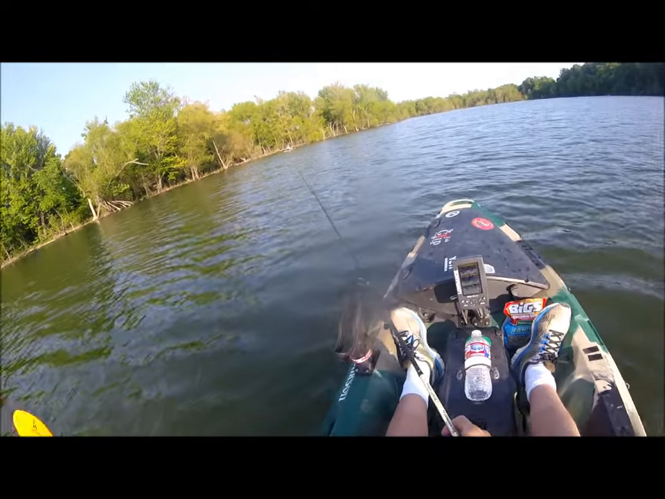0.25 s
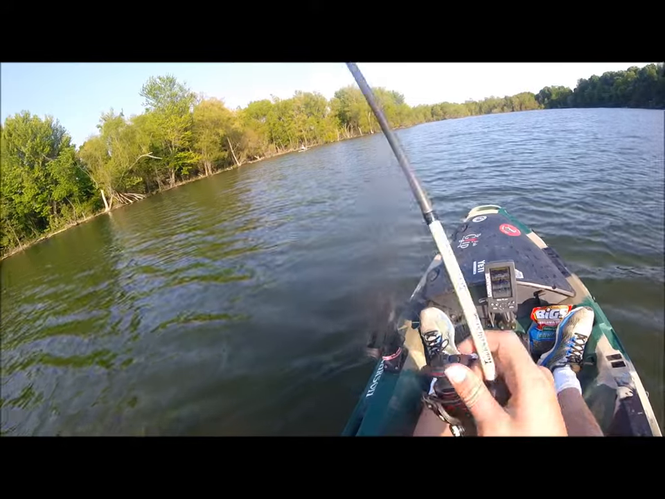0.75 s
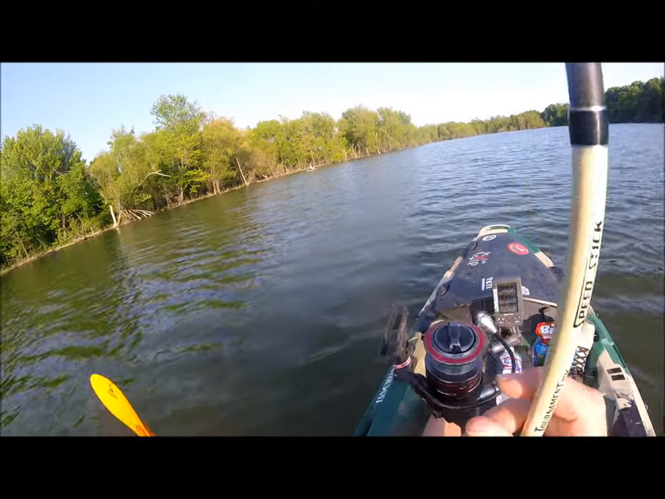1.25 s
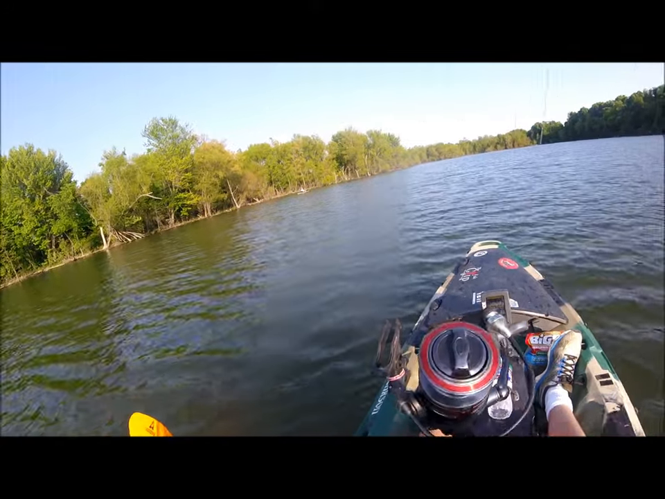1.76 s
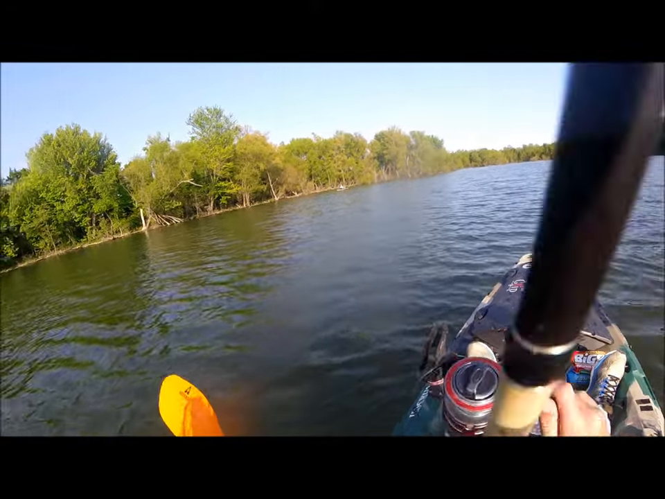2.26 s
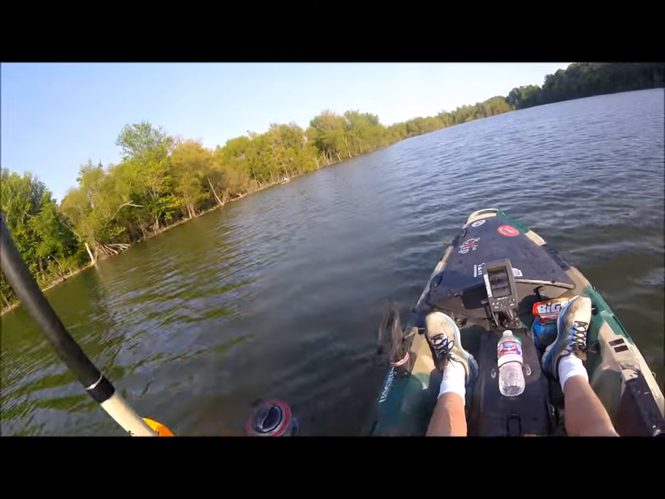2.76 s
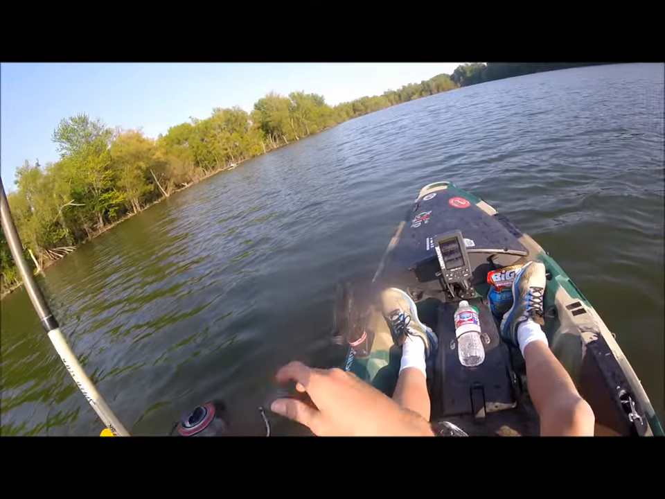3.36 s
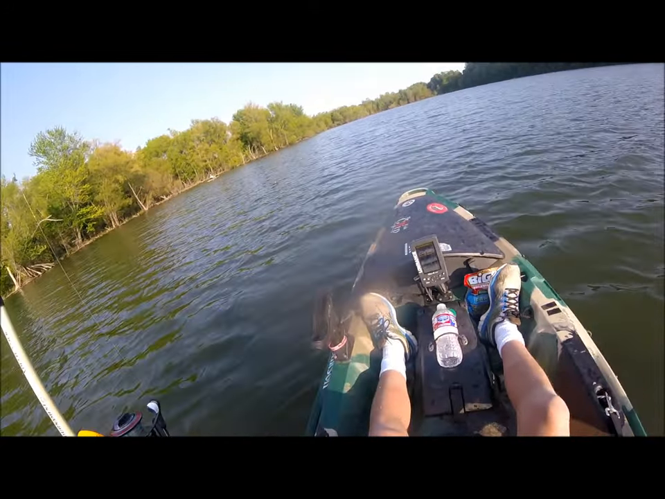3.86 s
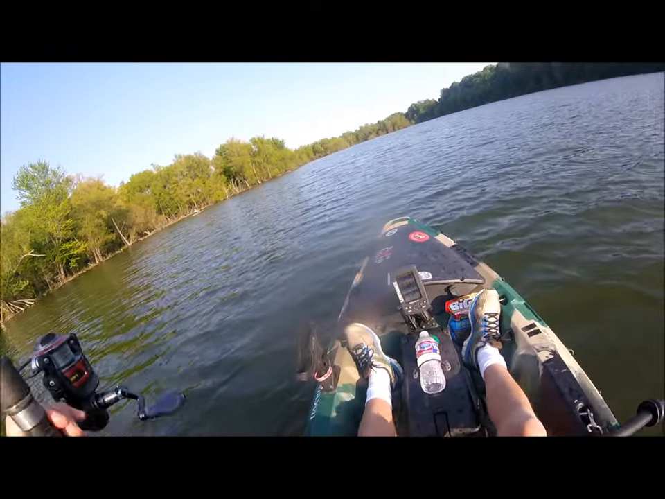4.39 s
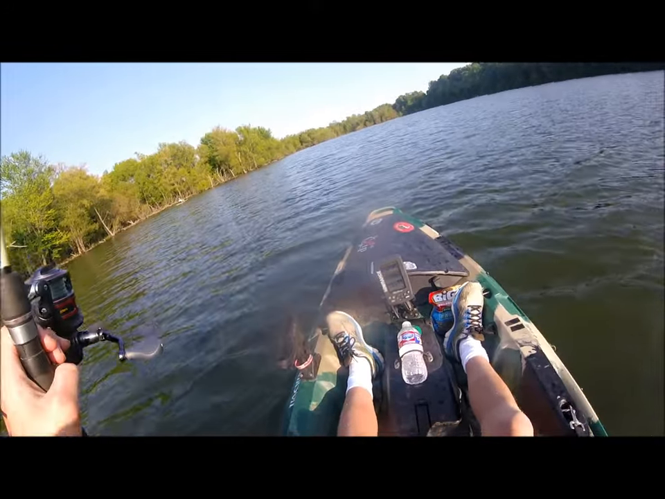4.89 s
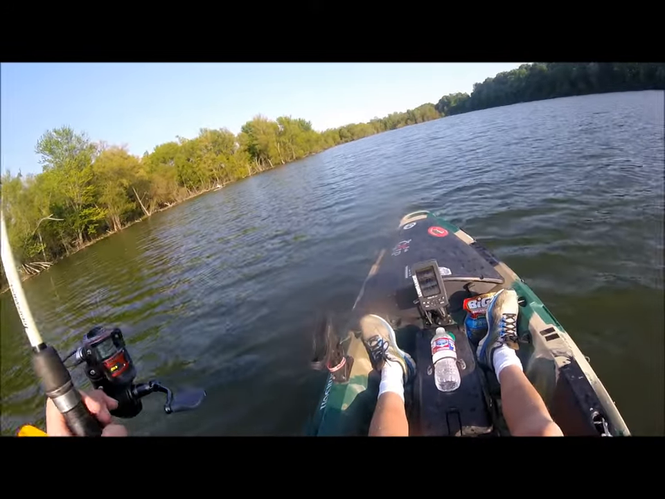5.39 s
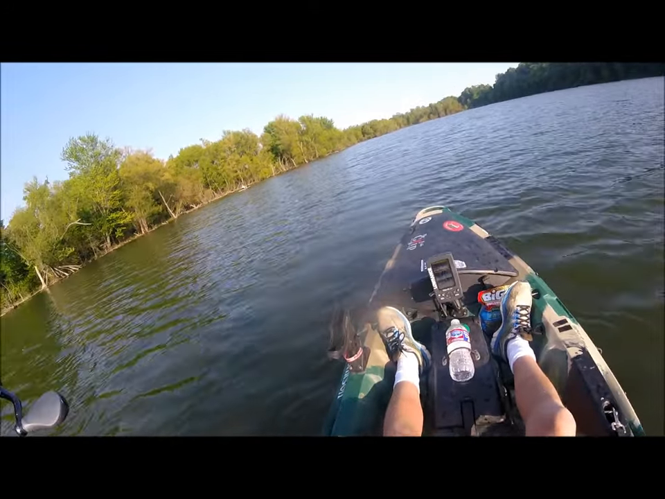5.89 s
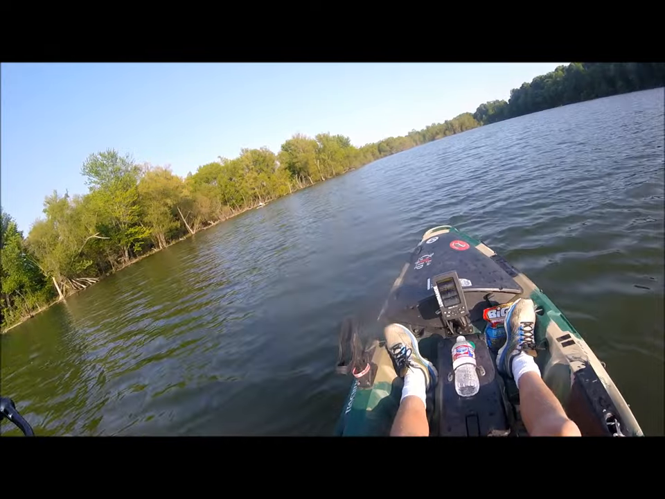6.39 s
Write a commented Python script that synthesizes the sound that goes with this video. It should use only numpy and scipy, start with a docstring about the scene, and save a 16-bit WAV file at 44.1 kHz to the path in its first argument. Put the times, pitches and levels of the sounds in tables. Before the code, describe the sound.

A close, body-worn microphone on a small plastic kayak on open water. From 0 to 0.7 seconds, droplets and light spray fall off a paddle, with bright plips and a few deeper, rounder plops, over lapping and a faint, low, distant motor drone that soon fades. From 0.8 to 2 seconds it is quieter, with sparse drips, tiny rod and reel ticks and a barely audible squeak. At 2.1 a loud, hollow knock hits the hull; at 2.36 a harder one cracks and clatters with a brief scuff. The background drops, then slowly recovers. Faint line scrapes and ticks run from 2.6 to 3.5, with soft wind puffs. Gusts rumble more from 4 onward. Around 4.55 to 4.75, clicks and a small drip meet a heavy, dull floor thump. Another double bump comes at 5.56. Soft rubbing, lapping and wind close the scene until 6.6.

```python
"""Hard knocks of gear on the hollow hull of a plastic kayak: damped modes excited through soft contacts.
Duller floor thuds are modal too; rod, reel and line tick, rub, scrape and squeak by contact and friction.
Drips and spray are ringing bubbles; lapping, fizz, air and wind on the body-worn microphone are filtered
noise; a distant motor is a wavering tone with its octave, beside a faint hum.
The recorder turns its gain down ahead of each overload and recovers slowly."""
import sys
import numpy as np
from scipy import signal
from scipy.io import wavfile
from scipy.ndimage import uniform_filter1d

SR = 44100
rng = np.random.default_rng(int(sys.argv[2]) if len(sys.argv) > 2 else 0)


def store_pcm(level_fs):
    """Save levels as 16-bit WAV."""
    pcm = np.round(np.clip(level_fs, -1, 1) * 32767).astype(np.int16)
    wavfile.write(sys.argv[1], SR, np.atleast_2d(pcm).T)


N = 292824

# distant motor: t/s, mean f/Hz, mean level/dB
MOTOR = [(0, 88.6, -49), (.3, 78.8, -51), (.9, 75.2, -45), (1.3, 76.35, -50.5), (1.75, 75.2, -51.5),
         (2.1, 76.9, -49), (2.6, 78.1, -69), (6.64, 80.3, -80.5)]
HUM_HZ, HUM_DB = 163, -61   # mean values; both waver
# relative noise spectra: f/Hz, spectral level/dB (per Hz)
WIND_COLOUR = [(15, -5.5), (30, 3.5), (55, 0), (100, -9), (160, -21.5), (260, -37), (600, -62), (2000, -93)]
LAP_COLOUR = [(80, 2.5), (180, 3), (450, 2), (900, -3), (1400, -13), (2200, -16.5), (4000, -53)]
FIZZ_COLOUR = [(700, -49), (1500, -2.5), (2200, -3), (3300, -6.5), (4600, -9.5), (5800, 1), (7000, -54.5),
               (10000, -79)]
AIR_COLOUR = [(200, -2.5), (2000, 4), (5000, -6), (7000, 6.5), (8500, -6), (10500, 0.5), (13500, -29),
              (16000, -30)]
AIR_DB, FIZZ_DB = -64, -68.5
# breeze on the microphone, before the wind trim: t/s, level/dB
BREEZE = [(0, -49), (.35, -43.5), (1.2, -49), (1.42, -38.5), (2.25, -45), (2.55, -44.5), (3.3, -41),
          (3.85, -47), (4.25, -39.5), (4.72, -38.5), (5.25, -37.5), (5.47, -45.5), (5.7, -38),
          (6.05, -42.5), (6.45, -39.5), (6.63, -48)]
# gusts, before the wind trim: crest t/s, standard deviation of the bell-shaped envelope/s, level/dB
GUSTS = [(2.672, 0.037, -34), (2.796, 0.03, -38.5), (3.083, 0.025, -34), (3.259, 0.02, -53),
         (3.976, 0.038, -32), (4.085, 0.027, -29), (4.318, 0.02, -31.5), (4.521, 0.038, -28.5),
         (4.794, 0.0053, -35), (4.86, 0.064, -34.5), (5.21, 0.014, -32), (5.301, 0.029, -34),
         (5.809, 0.012, -29.5), (5.908, 0.029, -30.5), (5.986, 0.026, -34.5), (6.194, 0.067, -35.5),
         (6.61, 0.035, -31.5)]
# continuous lapping, about which the level wanders: t/s, level/dB
LAPPING = [(0, -46), (.8, -55.5), (1.3, -52.5), (2, -54), (2.25, -55), (3.3, -60), (4.3, -57.5),
           (4.9, -59.5), (5.5, -51), (5.9, -56.5), (6.3, -58.5), (6.63, -49.5)]
# wavelets slapping the hull: crest t/s, level/dB
WAVELETS = [(.18, -40.5), (2.019, -48.5), (2.899, -52), (3.32, -53.5), (4.58, -48.5), (4.801, -48),
            (5.79, -48.5), (6.1, -54.5), (6.2, -50.5)]
WAVELET_RISE_S, WAVELET_FALL_S = 0.065, 0.087   # time constants
# water thrown up by the paddle and the line, before each layer's trim: t/s, hold/s, level/dB
SPLASHES = [(0.122, 0.2, -51), (0.443, 0.18, -52), (4.538, 0.065, -55.5)]
SPLASH_ATTACK_S, SPLASH_RELEASE_S = 0.038, 0.052   # time constants
# water trickling off the blade and along the hull, before each layer's trim: t/s, level/dB
TRICKLE = [(0, -69), (.8, -66.5), (1.25, -63.5), (2, -78), (2.4, -72), (4.4, -73.5), (4.8, -69),
           (6.63, -74)]
# clearest bubbles under drips: t/s, peak level/dB, starting f/Hz, pitch rise/(octaves per s), life/s
DRIPS = [(0.109, -45, 3150, 10, .005), (0.1318, -28, 2550, 5, 0.0018), (0.152, -46, 3600, 15, 0.0056),
         (.1786, -39, 2770, 15, 0.0053), (0.2074, -25, 3020, 4, 0.0041), (.223, -42, 4500, 10, .006),
         (0.243, -39, 3630, 9, 0.0059), (0.2442, -32, 5060, 8, 0.0036), (.259, -35, 867, 3, 0.044),
         (0.2831, -21, 682, 16, 0.019), (.292, -26.5, 736, 7, 0.024), (0.2858, -32, 1880, -2, 0.017),
         (0.2852, -29, 2600, 10, 0.0033), (0.3303, -34, 1700, 29, 0.008), (0.343, -44, 3260, 15, .005),
         (.3672, -41.5, 5750, 5, .005), (0.4013, -39.5, 4410, 10, .004), (0.4167, -34.5, 3180, 20, 0.0065),
         (0.4463, -36.5, 3800, 14, 0.0065), (0.462, -38, 903, 28, 0.023), (0.464, -35, 3180, 10, .005),
         (0.498, -36, 837, -5, 0.025), (0.4994, -35, 3780, 21, 0.0055), (0.501, -32.5, 1530, 54, 0.013),
         (0.6006, -32, 4930, 8, 0.0031), (0.604, -30, 1710, 4, 0.013), (0.6367, -29, 890, 20, 0.0077),
         (0.8478, -40.5, 2150, -24, 0.0081), (1.224, -36, 1170, 19, 0.0028), (1.456, -38.5, 860, 1, 0.0061),
         (1.818, -36, 682, 34, 0.049), (1.876, -41, 1070, 1, 0.0078), (4.556, -34, 5716, 10, 0.0037),
         (4.602, -24.5, 2680, 55, 0.0049), (4.607, -37, 1790, 40, .007), (4.617, -44, 4450, 5, 0.0071),
         (4.94, -41, 793, 19, 0.018), (5.039, -31.5, 610, 27.5, 0.035), (5.544, -38, 990, 12, 0.0071),
         (6.094, -41, 1010, 15, 0.0087), (6.293, -38, 1556, -15, 0.012), (6.4, -43.5, 765, 23.5, 0.068),
         (6.545, -37, 1100, 6, 0.0055)]
# thin squeaks: t/s, length/s, mean starting f/Hz, mean ending f/Hz, level/dB, octave level/dB re the tone
SQUEAKS = [(1.3, .11, 1005, 975, -67.5, 6), (1.53, .26, 1000, 988, -60, -2.5),
           (4.05, .06, 3850, 3800, -68, -20), (4.13, .14, 2700, 2570, -67, -20),
           (4.318, .05, 3420, 3330, -66, -20)]
# line scraping off the reel in strokes: t/s, length/s, centre f/Hz, level/dB
SCRAPES = [(2.581, 0.016, 5070, -63), (2.641, 0.028, 4900, -65), (2.705, 0.025, 5410, -63),
           (2.756, 0.025, 5300, -63), (3.142, 0.019, 5280, -58), (3.193, 0.021, 5400, -64),
           (3.213, 0.015, 5500, -56), (3.266, 0.035, 5460, -63), (3.318, 0.023, 5750, -61),
           (3.424, 0.011, 5340, -62), (3.453, 0.018, 5150, -60), (3.473, 0.041, 4950, -53)]
# rubs of line, rod and grip, and gear skidding on the hull: t/s, length/s, centre f/Hz, width/Hz, level/dB
RUBS = [(2.002, 0.097, 4810, 2420, -56.5), (2.37, 0.014, 5260, 1400, -34), (2.403, 0.012, 4450, 910, -25),
        (2.66, 1.25, 2370, 554, -66.5), (2.81, 0.23, 4500, 1300, -67), (5.321, 0.58, 4750, 1870, -63.5),
        (6.071, 0.15, 3550, 3300, -62.5), (6.188, 0.82, 4460, 2400, -64.5)]
# clearest ticks of rod and reel: t/s, peak level/dB, centre f/Hz
TICKS = [(1.158, -40.5, 4980), (1.257, -38, 2600), (1.408, -38.5, 2440), (1.697, -40.5, 3146),
         (1.954, -45, 2950), (2.715, -44, 6430), (2.815, -33.5, 4700), (3.133, -41.5, 3760),
         (3.162, -48, 3950), (3.292, -46, 5000), (3.493, -39, 4500), (3.788, -43.5, 4140),
         (4.326, -30, 4830), (4.4667, -46, 4120), (4.4752, -42, 4270), (4.4785, -40, 3970),
         (4.531, -49, 4000), (4.537, -33, 3560), (4.546, -35, 2900), (4.565, -39.5, 4500),
         (4.583, -39, 2900), (4.5916, -22.5, 3200), (4.595, -35, 2750), (4.647, -36, 4000),
         (4.794, -41, 3440), (5.08, -42.5, 5600), (5.242, -40.5, 4540), (5.299, -38, 2430),
         (5.313, -40.5, 4850), (5.806, -38.5, 2980), (5.814, -41, 3650), (6.291, -36, 2620)]
# spells in which the rod is handled: start t/s, end t/s
HANDLING = [(.7, 2.0), (4.7, 5.4)]
FAINT_TICK_DB, FAINT_TICK_HZ = -54, 3260   # centres of the random scatter
# dull bumps low in the boat: t/s, strength level/dB, contact low-pass f/Hz, boom level/dB
THUDS = [(4.6463, 0, 1110, 0), (4.656, 1, 150, 0), (4.676, -7, 600, -4.5), (4.704, -19, 350, 4),
         (4.762, -28, 1500, -2), (5.5612, -0.5, 2340, -12.5), (5.5668, -9, 474, 1), (5.575, -11, 800, -11),
         (5.59, -5.5, 141, 3.5), (5.608, -22.5, 1700, 0), (6.053, -20, 253, -3)]
# modes of the boat's floor, before random detuning and unevenness: f/Hz, level/dB, t60/s
FLOOR = [(107.4, -29, 0.2), (134.5, -24.5, 0.17), (243, -21, 0.076), (298, -22.5, 0.073), (320, -22, 0.047),
         (360, -17.5, 0.054), (400, -31, 0.05), (563, -28, 0.044), (689, -25.5, 0.048), (770, -37, 0.05),
         (1147, -22, 0.022), (1320, -29.5, 0.015), (1960, -38, 0.019), (3530, -42, 0.037)]
# hard contacts on the hull: t/s, strength level/dB, contact low-pass f/Hz, boom level/dB,
# crack level/dB re the blow, place (0 deck, 1 side wall), ring time as a share of the free hull's
# (gear that stays pressed on damps it)
KNOCKS = [(1.3083, -37.5, 1201, -12, -34, 0.97, 1.4), (2.0913, -1, 2570, -1.5, -9.5, 0.089, 1.15),
          (2.103, -13.5, 1290, -1.5, -35.5, 0.086, 0.75), (2.106, -12, 686, -1, -37, 0, 0.56),
          (2.1115, -13, 1210, -1.5, -29.5, 0.96, .6), (2.36, 6, 2300, -7.5, -5.5, 1, 1.04),
          (2.3614, -6.5, 1410, 7, -14.5, 0.63, .9), (2.3694, -11.5, 1300, 6, -6, 0.4, 0.86),
          (2.3748, -8, 1104, -3.5, -11, 0.6, 1.35), (2.389, -26, 910, -11, -4, 0.84, 1),
          (2.3955, -17.5, 1900, -7, -7, 0.37, 1), (2.4041, -14, 2210, 7.5, -5, 0.23, 1.2),
          (2.4095, -15.5, 970, 1, -9, 0.84, 1.4), (2.4235, -23.5, 900, -10, -17, 0.56, 0.84),
          (3.294, -42, 910, -10, -19.5, 0, 1.3)]
# modes of the free hollow hull: f/Hz, level/dB struck on the deck, level/dB struck on the side wall, t60/s
HULL = [(57, 0, -3.5, 0.1), (110, -8.5, -1, 0.06), (164, -18, -15.5, 0.11), (202, -17.5, -13.5, 0.097),
        (283, -10, -16, 0.05), (337, -10, -16.5, 0.05), (391, -5.5, -16, 0.058), (480.5, 2.5, -3, 0.054),
        (546, 0.5, -9.5, 0.034), (618, -7.5, -12, 0.036), (680, -12, -15, 0.032), (845, -14, -16.5, 0.028),
        (920, -14, -7.5, .032), (1000, -14, -8, 0.03), (1070, -10.5, -22, 0.031), (1245, -5, -30.5, 0.027),
        (1456, -4, -20.5, 0.027), (1720, -4.5, -22.5, 0.024), (1880, -5, -24, 0.022),
        (2275, -10, -27.5, 0.032), (2790, -17.5, -28, 0.04)]
# dense ring of the free hull and its fittings: f/Hz, level/dB, t60/s
HULL_RING = [(150, -32.5, 0.13), (296, -35, 0.054), (620, -22.5, 0.068), (1160, -25, 0.065),
             (2360, -28, 0.064), (4850, -49, 0.057)]
# resonances of the hard gear that strikes: f/Hz, level/dB, t60/s
GEAR = [(833, 17, 0.0014), (2530, -7.5, 0.017), (3480, 23.5, 0.00031), (4540, -10.5, 0.018),
        (4990, 0, 0.0042), (5560, -31, 0.0032)]
# recorder
CUTOFF_HZ = 14200
LOOK_AHEAD_S, RECOVERY_S = .044, 2.21
CEILING, FULL_SCALE = 1.02, .85   # amplitudes


def from_db(db):
    """Logarithmic level: decibels converted to amplitude gain."""
    return 10 ** (np.asarray(db) / 20)


def rms_one(x):
    """Normalisation: mean power brought to 1."""
    return x / np.sqrt(np.mean(x ** 2) + 1e-20)


def in_time(rows):
    """Linear interpolation: each column of a curve, sample by sample."""
    s, *columns = np.transpose(rows)
    return [np.interp(np.arange(N) / SR, s, c) for c in columns]


def add(out, s, sound):
    """Superposition: a short sound is summed in at time s."""
    at = max(int(round(s * SR)), 0)
    out[at:at + len(sound)] += sound[:max(N - at, 0)]


def passed(x, hz, kind, order=2):
    """Linear filtering by a Butterworth response."""
    edges = np.clip(hz, 10, .47 * SR)
    return signal.sosfilt(signal.butter(order, edges, kind, fs=SR, output="sos"), x)


def drift(rate):
    """Random fluctuation: chance values, rate per second, joined by lines; spread 1."""
    knots = rng.standard_normal(2000)
    return np.interp(np.arange(N) / SR * rate, np.arange(len(knots)), knots) * np.sqrt(3 / 2)


def noise(colour, patchy_db, flutter=20):
    """Spectral shaping: half-octave noise bands flicker partly together; rms 1."""
    edges = 14 * 2 ** (np.arange(21) / 2)
    hz, db = np.transpose(colour)
    white, together, out = rng.standard_normal((2, N)), drift(flutter), 0
    for k, (low, high) in enumerate(zip(edges, edges[1:])):
        log_centre = np.log(low * high) / 2
        level = np.interp(log_centre, np.log(hz), db, left=-100, right=-100)
        if level > -100:   # bands outside the curve stay silent
            flicker = np.clip(1.4 * together + drift(flutter), -3, 1.5)
            band = passed(white[k % 2], [low, high], "band")   # neighbours use independent noise
            out = out + from_db(level + patchy_db * flicker) * band
    return rms_one(out)


def burst(t, edges, level_db, t60):
    """Exponential decay: a band of noise that loses 60 dB in t60."""
    return rms_one(passed(rng.standard_normal(len(t)), edges, "band")) * from_db(level_db - 60 * t / t60)


def struck(modes, t, gains=1):
    """Modal superposition: decaying sines, all started by one blow."""
    hz, db, t60 = np.transpose(modes)[:, :, None]
    return np.sum(gains * from_db(db - 60 * t / t60) * np.sin(2 * np.pi * hz * t), axis=0)


def bubble(hz, rise, life):
    """Bubble resonance: an air pocket swells into ringing and changes pitch as it nears the surface."""
    t = np.arange(int(2 * life * SR)) / SR
    age = 7.7 * t / life
    pitch = hz * 2 ** (rise * np.minimum(t, life))
    return age * np.exp(1 - age) * np.sin(2 * np.pi * np.cumsum(pitch) / SR)


def swell(s, hold, rise, fall):
    """Exponential envelope: grows to 1 at time s, holds, then dies away."""
    t = np.arange(N) / SR - s
    return np.exp(np.minimum(t, 0) / rise - np.maximum(t - hold, 0) / fall)


def spray():
    """Power addition: falling water is the splashes on top of a trickle."""
    thrown = sum(from_db(db) * swell(s, hold, SPLASH_ATTACK_S, SPLASH_RELEASE_S) for s, hold, db in SPLASHES)
    return np.hypot(thrown, from_db(in_time(TRICKLE)[0]))


def motor(waver_db=2.5, second_db=-14):
    """Periodic source: a far motor drones with a fundamental and second harmonic, beside a faint hum."""
    hz, db = in_time(MOTOR)
    turn = 2 * np.pi * np.cumsum(hz + .8 * drift(4.6)) / SR
    drone = from_db(db + waver_db * drift(2.4)) * (np.sin(turn) + from_db(second_db) * np.sin(2 * turn))
    hum_turn = 2 * np.pi * np.cumsum(HUM_HZ + 2.3 * drift(19)) / SR
    hum = from_db(HUM_DB + waver_db * drift(14)) * np.sin(hum_turn)
    return np.sqrt(2) * (drone + hum)


def wind(trim_db=-1):
    """Turbulent pressure at the microphone port: lumpy low noise, short gusts over a light breeze."""
    t = np.arange(N) / SR
    gusts = sum(from_db(db) * np.exp(-.5 * ((t - s) / half) ** 2) for s, half, db in GUSTS)
    strength = np.hypot(from_db(in_time(BREEZE)[0]), gusts)
    return from_db(trim_db) * strength * noise(WIND_COLOUR, patchy_db=2.5)


def lake(churn_db=-1, froth_db=-4, grain_db=5, restless_db=2.4, swells_per_s=7):
    """Modulated noise: lapping and grainy fizz, both louder under spray, over the hiss of open air."""
    falling = spray()
    slaps = sum(from_db(db) * swell(s, 0, WAVELET_RISE_S, WAVELET_FALL_S) for s, db in WAVELETS)
    between = from_db(in_time(LAPPING)[0] + restless_db * drift(swells_per_s))
    lapping = np.sqrt(between ** 2 + slaps ** 2 + (from_db(churn_db) * falling) ** 2)
    fizz = np.hypot(from_db(FIZZ_DB), from_db(froth_db) * falling)
    water = lapping * noise(LAP_COLOUR, patchy_db=3.0, flutter=67)
    grains = rms_one(from_db(grain_db * np.clip(drift(250), -2, 2)))
    froth = passed(noise(FIZZ_COLOUR, patchy_db=2.5, flutter=120) * grains, 6400, "low", order=6)
    return water + fizz * froth + from_db(AIR_DB) * noise(AIR_COLOUR, patchy_db=-0.9)


def droplets(count=22000, low_hz=1050, high_hz=5700, cycles=13, size_db=8.0, trim_db=3):
    """Statistical superposition: spray as a dense wash of tiny bubbles, most of them faint."""
    out = np.zeros(N)
    for when, pitch, size, rise in rng.random((count, 4)):
        hz = low_hz + (high_hz - low_hz) * pitch ** 1.2
        strength = from_db(-size_db * np.log(size + .015))
        add(out, when * N / SR, strength * bubble(hz, 25 * rise, cycles / hz))
    return spray() * from_db(trim_db) * rms_one(passed(out, 6200, "low", order=10))


def drips(impact_db=-13, impact_t60=0.0033):
    """Impact and resonance: a drop smacks the surface and its bubble rings."""
    out, t = np.zeros(N), np.arange(SR // 30) / SR
    for s, db, hz, rise, life in DRIPS:
        impact = rng.standard_normal(len(t)) * from_db(-60 * t / impact_t60)
        smack = passed(impact, [900, 4500], "band", order=4)
        add(out, s, from_db(db + impact_db) * 2 * smack)
        add(out, s, from_db(db) * bubble(hz, rise, life))
    return out


def squeaks(waver=0.0084):
    """Frequency modulation: thin tones swell, sag a little in pitch and fade."""
    out, wobble = np.zeros(N), 1 + waver * drift(60)
    for s, length, start_hz, end_hz, db, octave_db in SQUEAKS:
        n = int(length * SR)
        hz = np.linspace(start_hz, end_hz, n) * wobble[int(s * SR):][:n]
        turn = 2 * np.pi * np.cumsum(hz) / SR
        tone = np.sin(turn) + from_db(octave_db) * np.sin(2 * turn)
        add(out, s, from_db(db) * np.sqrt(np.hanning(n)) * tone)
    return out


def scrapes(catches_per_s=1100, uneven_db=4, width_hz=1300, lean=0.94):
    """Stick-slip friction: the line slips in a run of tiny catches that builds up and breaks off."""
    out = np.zeros(N)
    for s, length, hz, db in SCRAPES:
        n = int(length * SR)
        chance, size = rng.random(SR // 4)[:n], rng.standard_normal(SR // 4)[:n]
        catches = (chance < catches_per_s / SR) * from_db(uneven_db * size)
        stroke = np.sin(np.pi * np.linspace(0, 1, n) ** lean)
        padded = np.pad(catches * stroke, (0, SR // 200))   # room for the filter to ring out
        grit = passed(padded, [hz - width_hz / 2, hz + width_hz / 2], "band")
        add(out, s, from_db(db) * rms_one(grit))
    return out


def rubs(grain_db=3):
    """Sliding friction: narrow-band noise swells and fades, catching unevenly."""
    out, catching = np.zeros(N), from_db(grain_db * drift(200))
    for s, length, hz, width, db in RUBS:
        hiss = passed(rng.standard_normal(2 * SR), [hz - width / 2, hz + width / 2], "band")
        hiss = rms_one(hiss)[:int(length * SR)]
        add(out, s, from_db(db) * hiss * signal.windows.tukey(len(hiss), .5))
    return out * catching


def ticks(t60=0.017, spread=1.365, snap_db=-17, count=6, uneven_db=3, scatter_octaves=0.14):
    """Brief impact: small hard contacts on rod and reel, with fainter random ones while it is handled."""
    out, t = np.zeros(N), np.arange(SR // 16) / SR
    faint = []
    for span in HANDLING:
        for _ in range(count):
            db = FAINT_TICK_DB + uneven_db * rng.normal()
            hz = FAINT_TICK_HZ * 2 ** (scatter_octaves * rng.normal())
            faint.append((rng.uniform(*span), db, hz))
    for s, db, hz in TICKS + faint:
        contact = rng.standard_normal(len(t)) * from_db(-60 * t / t60)
        ring = passed(passed(contact, [hz / spread, hz * spread], "band"), 9770, "low", order=4)
        tick = ring + from_db(snap_db) * passed(contact, [1200, 8500], "band", order=3)
        add(out, s, from_db(db) * tick / np.abs(tick).max())
    return out


def thuds(boom_hz=520, uneven_db=2, detune=0.028, wash_db=-33, wash_t60=0.2, wash_hz=450,
          onset_s=0.00096, clatter_db=-35, clatter_t60=.09, clatter_hz=640, stutter_db=4):
    """Modal excitation by soft bumps: the floor booms, a little differently tuned each time."""
    out, t = np.zeros(N), np.arange(SR // 3) / SR
    mode_hz, mode_db, mode_t60 = np.transpose(FLOOR)
    deep = 1 / (1 + (mode_hz / boom_hz) ** 8)   # share of the boom level in each mode
    for s, db, contact_hz, boom_db in THUDS:
        pitch, strength = rng.standard_normal((2, len(FLOOR)))
        blow_db = mode_db + boom_db * deep + uneven_db * strength
        modes = np.column_stack([mode_hz * (1 + detune * pitch), blow_db, mode_t60])
        wash = burst(t, [wash_hz / 2, wash_hz], wash_db + boom_db, wash_t60)   # diffuse tail
        loose = from_db(stutter_db * drift(325)[:len(t)])   # loose fittings chatter
        chatter = passed(rng.standard_normal(len(t)) * loose, [clatter_hz / 2, clatter_hz * 2], "band")
        clatter = rms_one(chatter) * from_db(clatter_db - 60 * t / clatter_t60)
        boom = (struck(modes, t) + wash + clatter) * (1 - np.exp(-t / onset_s))
        add(out, s, from_db(db) * passed(boom, contact_hz, "low"))
    return out


def knocks(boom_hz=180, uneven_db=2, rattle_db=-22, rattle_t60=0.054, radiate_hz=40, crack_hz=6100,
           glint_db=-24):
    """Modal excitation by hard blows: the hull rings through a contact low-pass; the gear cracks and rattles."""
    out, t = np.zeros(N), np.arange(SR // 3) / SR
    mode_hz, deck_db, side_db, mode_t60 = np.transpose(HULL)
    deep = 1 / (1 + (mode_hz / boom_hz) ** 4)   # share of whole-hull flexing in each mode
    signs = np.where(deep > .5, -1, 1)[:, None]   # the hull as a whole recoils against the struck panel
    high = mode_hz > 1200
    signs[high] = (-1) ** np.arange(np.sum(high))[:, None]   # high modes alternate in phase
    for s, db, contact_hz, boom_db, crack_db, place, ring in KNOCKS:
        place_db = deck_db + np.clip(place, 0, 1) * (side_db - deck_db)
        mode_db = place_db + boom_db * deep + uneven_db * rng.standard_normal(len(deep))
        body = struck(np.column_stack([mode_hz, mode_db, mode_t60 * ring]), t, signs)
        for hz, ring_db, t60 in HULL_RING:
            body = body + burst(t, [hz / np.sqrt(2), hz * np.sqrt(2)], ring_db, t60 * ring)
        body = passed(body, contact_hz, "low")   # soft contacts spare the high modes
        body = passed(body, radiate_hz, "high")
        rattle = burst(t, [3900, 5900], rattle_db, rattle_t60)
        gear = passed(struck(GEAR, t) + rattle, 370, "high")
        glint = from_db(glint_db) * passed(gear, [7000, 12000], "band")
        crack = passed(gear, crack_hz, "low", order=10) + glint
        add(out, s, from_db(db) * (body + from_db(crack_db) * crack))
    return out


def scene():
    """Linear superposition: all sources summed at one microphone."""
    background = motor() + wind() + lake()
    water = droplets() + drips()
    handling = squeaks() + scrapes() + rubs() + ticks()
    return (background + water + handling + thuds() + knocks())[None]


def record(dry):
    """Gain control: look-ahead limiting with slow recovery, rounded peaks, then a steep low-pass."""
    t = np.arange(N) / SR
    excess = np.maximum(1 - CEILING / np.maximum(np.abs(dry[0]), CEILING), 1e-9)
    # largest excess so far, each decaying exponentially
    held = np.exp(np.maximum.accumulate(np.log(excess) + t / RECOVERY_S) - t / RECOVERY_S)
    gain = 1 - uniform_filter1d(np.interp(t + LOOK_AHEAD_S, t, held), size=200)
    limited = dry * gain
    overshoot = limited - FULL_SCALE * np.tanh(limited / FULL_SCALE)
    shaved = uniform_filter1d(uniform_filter1d(overshoot, size=5), size=4)   # smoothed before removal
    rounded = limited - shaved
    return signal.sosfilt(signal.ellip(10, .1, 80, CUTOFF_HZ, fs=SR, output="sos"), rounded)


dry = scene()
out = record(dry)
store_pcm(out)
```